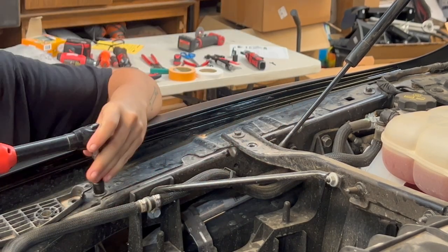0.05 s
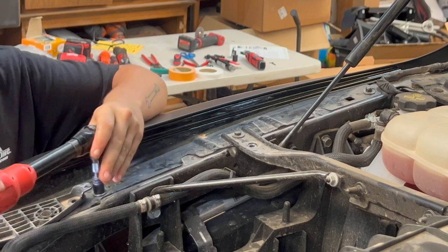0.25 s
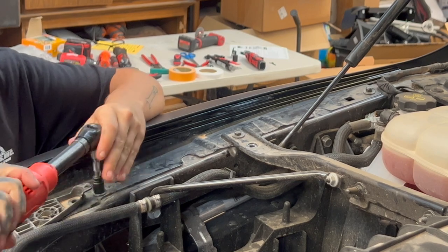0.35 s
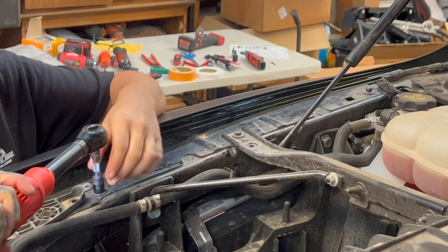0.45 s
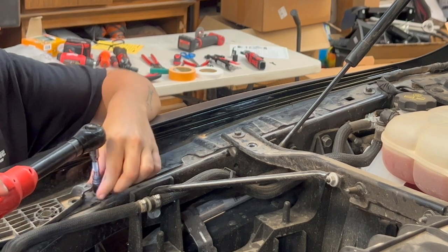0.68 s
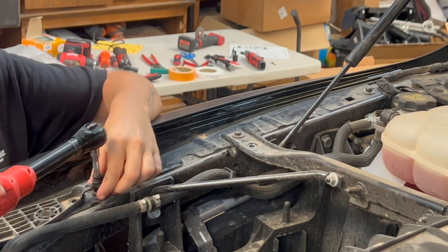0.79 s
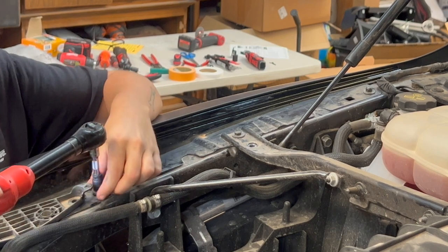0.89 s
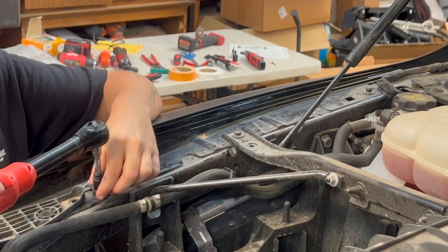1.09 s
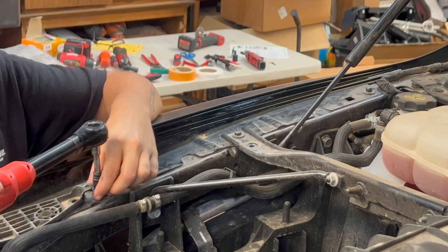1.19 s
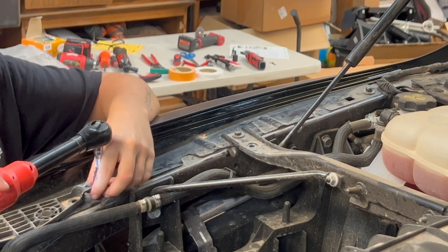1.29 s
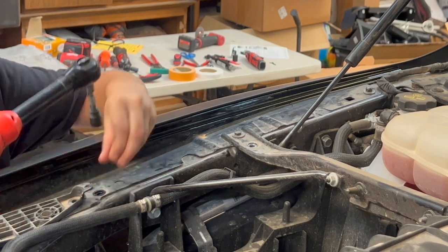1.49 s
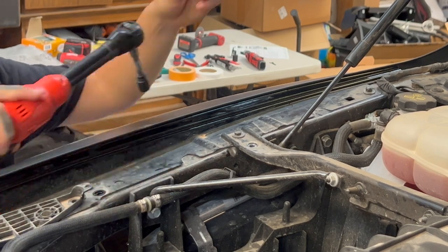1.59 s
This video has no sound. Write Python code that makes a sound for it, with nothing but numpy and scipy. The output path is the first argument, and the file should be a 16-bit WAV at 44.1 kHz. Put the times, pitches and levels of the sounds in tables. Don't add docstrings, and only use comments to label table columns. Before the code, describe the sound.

Close, dry sound of a power ratchet on a car bolt; two small metallic clacks, a brief pause, a loud grinding gear whirr with irregular knocks, then a falling squeal and fading clicks over faint room hum.

```python
import sys
import numpy as np
from scipy import signal
from scipy.fft import rfft, irfft
from scipy.io import wavfile
from scipy.ndimage import uniform_filter1d

SR = 44100
rng = np.random.default_rng(int(sys.argv[2]) if len(sys.argv) > 2 else 0)


def how_loud(loudness_db):
    steps = np.asarray(loudness_db, float) / 20
    return 10 ** steps


def wav_record(signal):
    frames = np.transpose(np.atleast_2d(signal))
    bounded = np.clip(frames, -1, 1)
    quanta = np.round(bounded * 32767).astype(np.int16)
    wavfile.write(sys.argv[1], SR, quanta)


N = 72765
T = np.arange(N) / SR
SHAFT_HZ, START_S, RELEASE_S = 246.2, .2445, 1.372
SINCE_START = np.maximum(T - START_S, 0)
SINCE_RELEASE = np.maximum(T - RELEASE_S, 0)
LOAD_FADE_S = 0.0064


def unit(x):
    return x / np.sqrt(np.mean(x ** 2))


def curve(table):
    t, level = np.transpose(table)
    return np.interp(T, t, level)


def colour(x, table):
    hz = np.maximum(np.arange(1025) * SR / 2048, 1)
    points_hz, points_db = np.transpose(table)
    log_gain = np.interp(np.log(hz), np.log(points_hz), points_db) * np.log(10) / 20
    cepstrum = irfft(log_gain)
    cepstrum[1:1024] *= 2
    cepstrum[1025:] = 0
    response = irfft(np.exp(rfft(cepstrum)))
    return signal.fftconvolve(x, response)[:N]


def rings(x, table):
    total = 0
    for hz, width, db in table:
        mode = signal.lfilter(*signal.iirpeak(hz, hz / width, SR), x)
        total = total + how_loud(db) * mode * np.sqrt(100 / width)
    return total


def walk(rate):
    k = int(SR / rate)
    steps = np.repeat(rng.standard_normal(N // k + 1), k)
    return unit(uniform_filter1d(uniform_filter1d(steps, k), k)[:N])


def grains(per_s, scatter_db):
    happens = rng.random(N) < per_s / SR
    return unit(happens * rng.standard_normal(N) * how_loud(scatter_db * rng.exponential(size=N)))


def bursts(rows):
    return sum(how_loud(db) * (T >= s) * np.exp(-np.maximum(T - s, 0) / decay) for s, db, decay in rows)


def band(hz, width):
    low_pass = signal.butter(2, width, fs=SR, output="sos")
    slow = signal.sosfilt(low_pass, rng.standard_normal((2, N)))
    phase = 2 * np.pi * np.cumsum(hz * np.ones(N)) / SR
    return unit(slow[0] * np.cos(phase) + slow[1] * np.sin(phase))


def orders(table, turn):
    total = 0
    for order, db in table:
        level = how_loud(db + 2.2 * walk(22))
        total = total + level * np.sin(2 * np.pi * (order * turn + rng.random()))
    return total


def shaft():
    coast = np.exp(-SINCE_RELEASE / .15)
    speed = (1 - .45 * np.exp(-SINCE_START / .045)) * coast
    turn = np.cumsum(SHAFT_HZ * speed * (1 + 0.00503 * walk(25.07))) / SR
    return turn, coast


def gear_rattle(turn):
    # t/s, level/dB
    rattle_level = [
        (.24, -20),
        (.3, -18),
        (.34, -17.5),
        (.7, -17.5),
        (.76, -19.5),
        (1.1, -21.5),
        (1.36, -23.5),
    ]
    # f/Hz, density/dB per Hz
    gears = [(350, -52), (600, -6), (1470, -13.5), (1660, -9), (1850, -7), (5330, -5), (6290, -3),
             (10000, -0.5), (16000, 0.5)]
    # f/Hz, width/Hz, level/dB
    casing = [(2610, 260, -6), (4040, 120, -5), (4700, 100, -9), (5360, 200, 6), (7300, 300, -7),
              (10080, 300, -4), (11800, 300, -9), (14700, 250, -7)]
    # shaft order, level/dB re rattle
    rotor = [(1, -40), (2, -29.5), (3, -32.5), (4, -20.5), (5, -27.5), (7, -31)]
    depth = np.where(SINCE_RELEASE > 0, .2, .15)
    teeth = grains(16000, 1.0) * (1 + depth * np.cos(2 * np.pi * turn)) * how_loud(0.8 * walk(39.44))
    casing_drive = 0.2 + 0.68 * np.exp(-SINCE_RELEASE / 0.013)
    rattle = unit(colour(teeth + rings(teeth * casing_drive, casing), gears))
    body = signal.sosfiltfilt(signal.butter(3, 1700, fs=SR, output="sos"), rattle)
    driven = how_loud(-4.5 * (2.0 - np.exp(-SINCE_RELEASE / LOAD_FADE_S)))
    rattle = rattle + (driven - 1) * body + driven ** 2 * orders(rotor, turn)
    return rattle * how_loud(curve(rattle_level))


def loaded_bolt(turn):
    # t/s, level/dB
    load_level = [(0.244, -15), (0.25, -17.5), (0.272, -13.5), (0.346, -24), (0.422, -21.5), (0.5, -25.5),
                  (0.506, -23), (0.562, -23.5), (0.588, -30), (0.626, -22.5), (0.664, -27), (0.946, -32.5),
                  (1.3, -37), (1.354, -30.5), (1.37, -79)]
    # f/Hz, density/dB per Hz
    panel = [(59, -74.5), (100, -30), (200, -14), (289, -19), (681, -11.5), (742, -10), (866, -15),
             (1750, -8), (6000, -8.5), (7800, -23), (13200, -120)]
    # f/Hz, width/Hz, level/dB
    panel_modes = [(363, 45, -1), (543, 67, -0.5), (950, 40, 3.5), (1193, 34, 1), (1655, 75, -1.5),
                   (2440, 200, -1)]
    # shaft order, level/dB
    drone = [(2, -13.5), (3, -2), (4, -16), (5, -5.5), (6, -7.5), (7, -1.5), (8, -10), (9, -6), (10, -4),
             (11, -8.5)]
    # t/s, level/dB
    grip = [
        (.3, -54),
        (.35, -37),
        (.42, -30.5),
        (.56, -29),
        (.59, -40),
        (.625, -25.5),
        (.67, -49),
        (.72, -35),
        (.8, -62),
    ]
    # t/s, level/dB rms
    shaft_hum = [(.27, -48), (.34, -42), (.55, -44), (.68, -46), (.72, -55), (.76, -47), (.85, -51),
                 (1.0, -55), (1.36, -61), (1.4, -80)]
    grit = grains(8000, 0.27) * how_loud(1.2 * walk(42.73))
    rumble = unit(colour(grit + rings(grit, panel_modes), panel))
    load = how_loud(curve(load_level)) * np.exp(-SINCE_RELEASE / LOAD_FADE_S)
    drone_tones = how_loud(curve(grip)) * unit(orders(drone, turn))
    hum = np.sqrt(2) * how_loud(curve(shaft_hum) + walk(15.1)) * np.sin(2 * np.pi * turn)
    moan = how_loud(-53) * np.exp(-((T - 1.44) / .05) ** 2) * band(420 - 900 * SINCE_RELEASE, 25)
    return load * how_loud(-1.5) * rumble + drone_tones + hum + moan


def whine():
    tone_hz, blur_hz = 10142, 35
    tone = band(tone_hz, blur_hz) + how_loud(-4) * band(tone_hz - SHAFT_HZ, 2 * blur_hz)
    return tone * how_loud(-38) * np.clip((T - .7) / 0.28, 0, 1) * np.exp(-SINCE_RELEASE / 0.0098)


def slack_gears(turn):
    # f/Hz, width/Hz, level/dB
    backlash = [(1200, 500, -6), (2500, 450, 0), (3100, 300, -4), (5400, 600, -8), (7600, 700, -6)]
    slap = np.exp(-(turn % 1) / .35)
    slack = how_loud(-43) * unit(rings(rng.standard_normal(N) * slap, backlash))
    squeal = how_loud(-28) * (0.18 + slap) * band(12200 - 9500 * SINCE_RELEASE, 150)
    fading = np.clip((1.535 - T) / .03, .25, 1)
    return (slack + squeal) * fading * np.clip(SINCE_RELEASE / 0.047, 0, 1)


def motor():
    turn, coast = shaft()
    running = np.clip((T - START_S) / .0015, 0, 1)
    slowing = how_loud(10 * np.log2(coast))
    gears = slowing * (gear_rattle(turn) + slack_gears(turn))
    return running * (gears + loaded_bolt(turn) + whine())


def head_chatter():
    # t/s, length/s, level/dB
    knocks = [(0.245, 0.0089, -21.5), (0.254, 0.0662, -17.5), (0.406, 0.06, -30), (0.529, 0.025, -28),
              (0.6, 0.044, -27), (0.684, 0.017, -30), (0.703, 0.014, -24), (0.786, 0.012, -27.5),
              (0.848, 0.013, -31), (0.867, 0.016, -30), (0.893, 0.028, -38), (0.942, 0.015, -26.5),
              (1.009, 0.007, -32), (1.03, 0.0087, -25.5), (1.098, 0.021, -33.5), (1.167, 0.018, -34),
              (1.242, 0.047, -33.5), (1.343, 0.0043, -48)]
    # f/Hz, width/Hz, level/dB
    head_modes = [(987, 53, 0), (2210, 29, -10), (2510, 56, -2), (3750, 270, 2), (4010, 96, 8.5),
                  (4486, 46, 4), (4650, 82, 5), (5110, 130, 1.5), (6600, 490, -19)]
    # f/Hz, level/dB
    knock_colour = [(300, -40), (1200, 1), (4000, -2), (7000, 4), (16000, 0.5)]
    bouts = sum(how_loud(db) * ((T >= s) & (T < s + length)) for s, length, db in knocks)
    bouts = uniform_filter1d(bouts, size=200)
    hits = grains(4000, 0.58)
    ringing = rings(hits * bouts, head_modes) / np.std(rings(hits, head_modes))
    return ringing + how_loud(-3) * colour(hits * bouts, knock_colour)


def gear_ticks():
    # t/s, level/dB
    ticks = [(1.4005, -27), (1.418, -27), (1.4275, -26), (1.438, -29), (1.478, -31), (1.489, -31),
             (1.519, -35), (1.53, -35), (1.5445, -35), (1.5575, -39), (1.5715, -33), (1.5875, -35),
             (1.6055, -34), (1.617, -41), (1.626, -32), (1.639, -41)]
    # f/Hz, density/dB per Hz
    tick_colour = [(500, -30), (1500, -20), (2500, -11), (4000, -8), (6000, -7), (10300, 0), (12500, -5),
                   (16000, -4)]
    # f/Hz, width/Hz, level/dB
    tick_modes = [(2500, 240, -14), (4130, 280, -6), (5100, 400, -4), (7800, 400, -2), (10400, 320, 2),
                  (13600, 500, 1)]
    taps = bursts([(s, db, .0016) for s, db in ticks])
    click = unit(colour(rng.standard_normal(N), tick_colour)) * taps
    return click + how_loud(12) * rings(rng.standard_normal(N) * taps, tick_modes)


def clunks():
    # t/s, f/Hz, level/dB, decay/cycles
    thumps = [(.0365, 600, -33, 3), (.061, 600, -40, 3), (.0835, 620, -22, 3), (.088, 340, -27, 3),
              (.292, 345, -26, 5), (.505, 335, -37, 5), (.612, 335, -30, 5), (.7, 340, -38, 5),
              (1.27, 380, -46, 5), (1.42, 11600, -28, 15), (1.428, 11900, -27, 15), (1.438, 11700, -28, 15),
              (1.397, 2400, -29, 4), (1.404, 2500, -32, 4), (1.427, 2200, -32, 3), (1.4425, 2500, -33, 3),
              (1.45, 2600, -28, 3), (1.4575, 2600, -28, 3), (1.465, 2700, -29, 3), (1.4735, 2500, -32, 3),
              (1.481, 2400, -33, 3), (1.442, 1300, -41, 1.5), (1.4565, 1300, -40, 1.5),
              (1.465, 1300, -41, 1.5), (1.473, 1300, -41, 1.5), (1.481, 1200, -41, 1.5),
              (1.49, 1000, -41, 1.5), (1.5005, 2300, -37, 3), (1.509, 1100, -42, 1.5),
              (1.519, 1100, -41, 1.5), (1.531, 1100, -43, 1.5), (1.5445, 1000, -43, 1.5),
              (1.558, 900, -43, 1.5), (1.532, 3100, -38, 8), (1.5455, 3100, -39, 8), (1.559, 3100, -40, 8),
              (1.573, 1000, -46, 1.5), (1.589, 1100, -49, 1.5), (1.617, 2500, -43, 4), (1.64, 2600, -45, 4)]
    total = 0
    for s, hz, db, cycles in thumps:
        total = total + bursts([(s, db, cycles / hz)]) * np.sin(2 * np.pi * hz * (T - s))
    return total


def socket():
    # t/s, level/dB, decay/s
    clacks = [
        (.018, -40, 0.0029),
        (.0285, -28.5, 0.0058),
        (.0785, -19, 0.0024),
        (.0815, -19.5, 0.0051),
        (.163, -48.5, 0.0082),
        (.195, -57, .003),
        (.2365, -40.5, 0.02),
    ]
    # f/Hz, level/dB, T60/s
    socket_modes = [(340, -28, .09), (640, -28, .07), (1100, -29, .05), (1900, -26, .05), (2150, -25, .05),
                    (4221, -27, .05), (5093, -26, .05), (6471, -30, .05), (7500, -27, .03)]
    # f/Hz, density/dB per Hz
    crack_colour = [(150, -43.5), (350, -14), (1200, -13.5), (2100, -2.5), (3300, -15.5), (4400, -6),
                    (8000, -11.5), (16000, -17.5)]
    # t/s, level/dB
    scrape = [
        (0, -57),
        (.017, -57),
        (.019, -42),
        (.05, -45),
        (.06, -41),
        (.077, -37),
        (.085, -52),
        (.16, -59),
        (.2, -63),
        (.21, -80),
    ]
    # f/Hz, density/dB per Hz
    slide_colour = [(120, -40), (200, -8), (2130, -7.5), (2650, -5.5), (3760, -7.5), (11700, -18.5),
                    (16000, -43)]
    blows = bursts(clacks)
    crack = unit(colour(rng.standard_normal(N), crack_colour)) * blows
    modes = [(hz, 1.5 / t60, db) for hz, db, t60 in socket_modes]
    ring = rings(rng.standard_normal(N) * blows, modes)
    slide = unit(colour(grains(15000, 1.0), slide_colour)) * how_loud(curve(scrape) + 2.0 * walk(165))
    return crack + how_loud(29) * ring + slide


def garage():
    # f/Hz, density/dB per Hz
    room_tone = [(50, -9), (120, 5.5), (260, -4), (450, -15), (1300, -22), (4000, -31), (9000, -29),
                 (16000, -46)]
    # f/Hz, level/dB rms
    hum_tones = [(79.5, -61), (118.4, -59.5), (157, -58.5), (240, -64)]
    duck = how_loud(-13.5 * (1 - np.exp(-SINCE_START / 0.54)))
    air = [unit(colour(rng.standard_normal(N), room_tone)) * how_loud(-53 + 1.0 * walk(3.5)) for _ in range(2)]
    hum = 0
    for hz, db in hum_tones:
        level = np.sqrt(2) * how_loud(db + 3.4 * walk(6.5))
        hum = hum + level * np.sin(2 * np.pi * (hz * T + rng.random()))
    return duck * (air[0] + hum), duck * air[1]


def reverberate(x):
    t = T[:SR // 2]
    t60_s = 0.13
    walls = rng.standard_normal(len(t)) * how_loud(-60 * t / t60_s) * np.clip(t / 0.00036, 0, 1)
    return signal.fftconvolve(x, walls / np.sqrt(np.sum(walls ** 2)))[:N]


def scene():
    # f/Hz, side level/dB
    width = [(60, -22), (300, -15), (3400, -9), (4200, -32), (5300, -30), (6200, -11), (7500, -12),
             (8500, -44), (16000, -48)]
    # f/Hz, side level/dB
    lean = [(100, -26), (350, -12.5), (800, -20), (2000, -34)]
    knocks = head_chatter() + gear_ticks() + clunks()
    tool = motor() + knocks + socket()
    air, air_side = garage()
    mid = tool + how_loud(-11.5) * reverberate(tool) + air
    side = colour(reverberate(tool + knocks) + air_side, width) - colour(mid, lean)
    return np.array([mid + side, mid - side])


def roll_off(x):
    return signal.sosfilt(signal.butter(12, 16970, fs=SR, output="sos"), x)


def record(dry):
    low_cut = signal.butter(5, 81, "high", fs=SR, output="sos")
    treble_cut = signal.ellip(10, .3, 70, 15720, fs=SR, output="sos")
    limit = 1.3
    limited = limit * np.tanh(signal.sosfilt(low_cut, dry) / limit)
    heard = signal.sosfilt(treble_cut, limited)
    return roll_off(heard)


dry = scene()
out = record(dry)
wav_record(out)
```